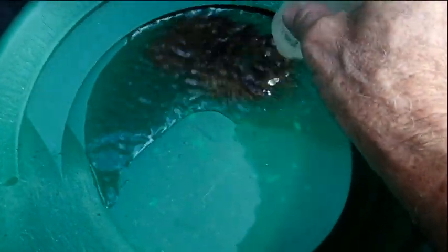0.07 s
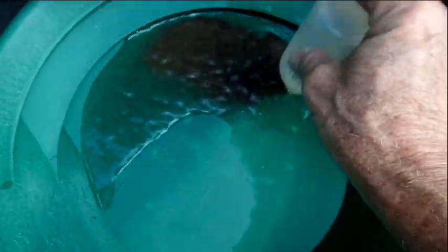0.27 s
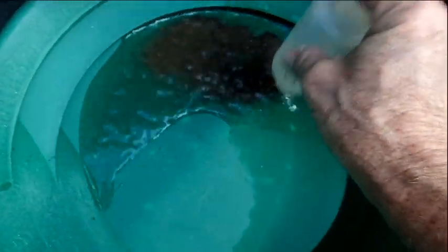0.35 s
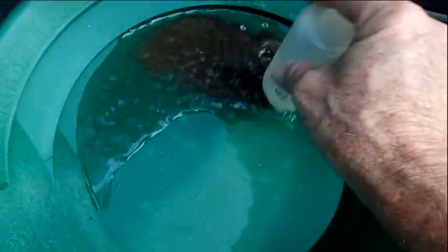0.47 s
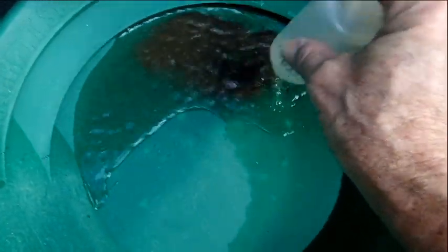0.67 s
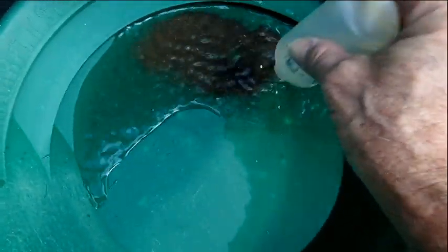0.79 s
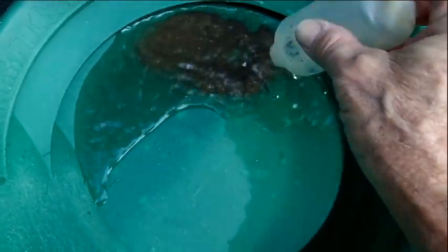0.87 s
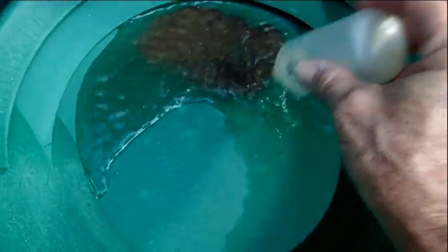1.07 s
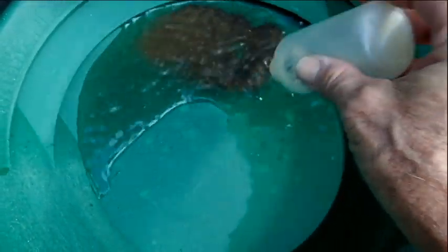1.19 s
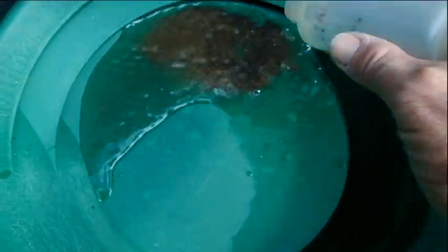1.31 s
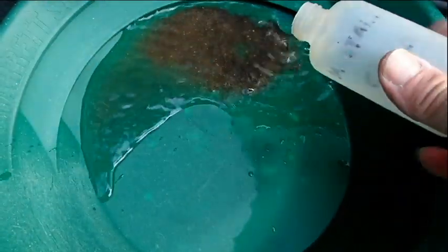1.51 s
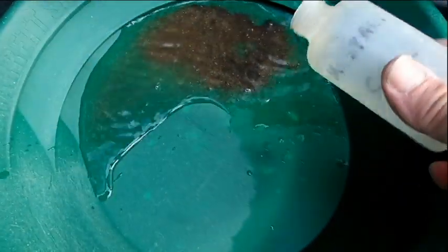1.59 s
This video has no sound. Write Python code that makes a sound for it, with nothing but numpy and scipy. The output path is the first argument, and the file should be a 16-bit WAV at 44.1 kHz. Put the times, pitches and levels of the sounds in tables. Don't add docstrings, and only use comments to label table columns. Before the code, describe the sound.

Close by, a wet plastic pan is knocked four times in quick succession, its water shaking, gulping and splattering; then only the running creek, a few tiny drips and soft wind buffeting on the left remain.

```python
import sys
import numpy as np
from scipy import signal
from scipy.fft import rfft, irfft, next_fast_len
from scipy.io import wavfile
from scipy.ndimage import uniform_filter1d, map_coordinates

SR = 44100
rng = np.random.default_rng(int(sys.argv[2]) if len(sys.argv) > 2 else 0)


def digitize_waveform(pressure):
    field = np.atleast_2d(pressure).T
    bounded = np.clip(field, -1, 1)
    quanta = np.round(bounded * 32767).astype(np.int16)
    wavfile.write(sys.argv[1], SR, quanta)


def boost(x):
    u = np.asarray(x, float) / 20
    return 10 ** u


N = 72765

RAP_TIMES = [.2451, .3723, .5282, .6486]
# [level/dB, hardness/dB per octave, rim share/dB, crack/dB]
RAP_BLOWS = [
    (-2, 1.5, 0.5, -18),
    (2.5, -6.5, 1, -7),
    (-1.5, 2.5, -7.5, -45),
    (2, 6, 5, 2),
]


def unit(x):
    return x / np.sqrt(np.mean(x ** 2) + 1e-20)


def along(points, hz):
    f, v = np.transpose(points)
    return np.interp(np.log(hz + 1), np.log(f + 1), v)


def curve(rows):
    return np.interp(np.arange(N) / SR, *np.transpose(rows))


def wobble(rate):
    knots = rng.standard_normal(400)
    return map_coordinates(knots, [np.arange(N) * rate / SR])


def filtered(x, response):
    m = next_fast_len(x.shape[-1] + SR // 4)
    hz = np.fft.rfftfreq(m, 1 / SR)
    return irfft(rfft(x, m) * response(hz), m)[..., :x.shape[-1]]


def rush(spectrum, patchy_db=0, size=N):
    z = signal.stft(rng.standard_normal(size), nperseg=512)[2]
    patches = uniform_filter1d(rng.standard_normal(z.shape), 5, 0)
    patches = uniform_filter1d(patches, 6, 1)
    x = signal.istft(z * boost(patchy_db * unit(patches)), nperseg=512)[1][:size]
    return unit(filtered(x, lambda hz: boost(along(spectrum, hz))))


def add(track, s, sound):
    part = track[round(s * SR):][:len(sound)]
    part += sound[:len(part)]


def creek():
    # [t/s, level/dB]
    strength = [(0.0, -1), (1.65, 0)]
    # [f/Hz, level/dB per Hz]
    babble = [(20, -34), (90, -4), (200, -4.5), (420, -4.5), (650, -12.5), (1000, -2.5), (1900, -14.5),
              (2700, -33.5)]
    spray = [(2500, -18), (3200, -21), (5000, -3.5), (6300, -0.5), (7500, -5), (9000, -0.5), (10500, -19),
             (13000, -15.5)]
    babble_covered = [(200, 11), (650, -1.5), (1300, 4.5), (2000, -8), (2400, -15), (3300, -29),
                      (4300, -15)]
    spray_covered = [(4300, -37), (4900, -21), (5400, -6), (6500, 0), (7500, -5), (9000, 0.5),
                     (10500, -11.5), (15000, -14.5)]
    flow = boost(curve(strength) + .4 * wobble(6))
    left = boost(-55.5 + 2.0 * wobble(24.8)) * rush(babble_covered, 0.5)
    left = left + boost(-52) * rush(spray_covered, 0.98)
    right = boost(-41) * rush(babble, 2.8) + boost(-46.5) * rush(spray, 1.0)
    return flow * np.array([left, right])


def wind():
    # [f/Hz, level/dB per Hz]
    buffet = [(15, -10), (52, -3), (100, -5), (200, -13.5), (300, -26.5), (650, -36), (1500, -71)]
    # [t/s, level/dB]
    gust = [(0, 0.5), (.15, -2.5), (.3, -3.5), (.45, -1.5), (.65, -3.5), (.85, -2), (1.05, 0.5), (1.2, 0.5),
            (1.35, 0), (1.5, -2.5), (1.65, -1)]
    # [t/s, level/dB, width/s]
    puffs = [(0.2127, -29, 0.00036), (0.215, -25, 0.0017), (0.3457, -21, 0.0036), (0.894, -27.5, 0.0032),
             (1.002, -32, 0.0014), (1.121, -28, 0.0045), (1.389, -24, 0.0026), (1.414, -28.5, 0.0008),
             (1.5928, -26.5, 0.00035), (1.604, -21.5, .0015), (1.6457, -21, 0.0014)]
    t = np.arange(N) / SR
    lumpy = boost(0.91 * wobble(30.13)) * rush(buffet, .8)
    out = unit(lumpy) * boost(-37.5 + curve(gust))
    for s, db, width in puffs:
        u = (t - s) / width
        out += boost(db) * (1 - u ** 2) * np.exp(-.5 * u ** 2)
    return out


def drops():
    # [t/s, level/dB, f/Hz, width/octaves]
    spits = [(0.041, -31.5, 12400, .5), (.047, -31.5, 5700, .6), (0.063, -33, 13500, .3),
             (.086, -35, 6140, 0.66), (.261, -26, 7900, 0.34), (.271, -27, 4550, 0.07),
             (.344, -32, 5300, 0.72), (0.404, -28, 6600, 0.25), (.418, -39, 4160, .15),
             (.440, -42, 12500, .3), (0.456, -38.5, 2980, .2), (0.479, -29.5, 4600, 0.3),
             (.551, -29, 8900, 0.46), (0.568, -20.5, 4750, 0.27), (.597, -27.5, 7250, 0.47),
             (0.6, -32, 13700, 0.25), (0.603, -32.5, 5330, 0.26), (.740, -34, 8200, 0.23),
             (0.825, -34, 8600, 0.12), (1.056, -40, 13500, .2), (1.119, -35, 13500, .2),
             (1.459, -36.5, 8900, 0.18), (1.519, -28.5, 7150, 0.4), (1.593, -25, 5240, 0.2)]
    t60 = .009
    out, t = np.zeros(N), np.arange(SR // 40) / SR
    for s, db, hz, octaves in spits:
        noise = rng.standard_normal(len(t))
        band = filtered(noise, lambda f: np.exp(-(np.log2((f + 1) / hz) / octaves) ** 2))
        fade = boost(db - 60 * t / t60) * (1 - np.exp(-t / 0.00033))
        add(out, s, fade * unit(band))
    return out


def glugs():
    glug_times = [.551, .585, .829, .708, .289, .400]
    # [first f/Hz, last f/Hz, level/dB, t60/s]
    pockets = [
        (157.41, 308, -5.5, 0.074),
        (320, 362, -16.5, .16),
        (290, 365, -30.5, 0.11),
        (183.6, 134, -23.5, 0.077),
        (193, 175, -26, 0.17),
        (227, 169, -18, 0.046),
    ]
    glide_s, rise_share = .007, .045
    out, t = np.zeros(N), np.arange(SR // 4) / SR
    for s, (first_hz, last_hz, db, t60) in zip(glug_times, pockets):
        cycles = last_hz * t - (last_hz - first_hz) * glide_s * (1 - np.exp(-t / glide_s))
        fade = boost(db - 60 * t / t60) * (1 - np.exp(-t / (rise_share * t60)))
        add(out, s, fade * np.sin(2 * np.pi * cycles))
    return out


def raps():
    # [f/Hz, level/dB, t60/s]
    pan = [(183.6, -37, 0.2), (259, -4, 0.036), (358, 1, 0.051), (436, 0, 0.042), (545.5, -8.5, 0.047),
           (659, -9, 0.032), (769, -1.5, 0.012), (950, -4.5, 0.027), (1022.5, -2, 0.032),
           (1166, -4.5, 0.012), (1570, -23.5, 0.03), (1903, -11, .015), (2710, -32, 0.0058),
           (4710, -26.5, 0.015)]
    signs = [1, 1, 1, -1, 1, 1, 1, 1, -1, 1, -1, 1, -1, 1]
    # [f/Hz, level/dB]
    crack_colour = [(600, -22), (2000, 11.5), (3300, -5), (4600, 5), (6000, -3), (10000, -16),
                    (16000, -20.5)]
    slosh_colour = [(120, 2), (250, 1), (400, 9), (600, 1), (1100, -7), (1900, -15.5), (3000, -41.5)]
    surge_colour = [(20, 3), (70, -4), (160, 7.5), (300, 10), (500, -37)]
    attack_s, rim_hz, rim_octaves = .0001, 1000, .4
    scatter_db, detune = 1.2, .008
    out, t = np.zeros(N), np.arange(SR // 3) / SR
    hz, db, t60 = np.transpose(pan)[:, :, None]
    octave = np.log2(hz / rim_hz)

    def rise(s):
        return 1 - np.exp(-t / s)

    swell = rise(attack_s + .004 * np.minimum(450 / hz, 1.2) ** 5) ** 2
    impulse = 1. * (np.arange(len(t)) == 0)
    click = filtered(impulse, lambda f: -boost(along(crack_colour, f)) * np.exp(-2j * np.pi * f * attack_s))
    click = click / np.abs(click).max()
    for s, (level_db, hard_db, rim_db, crack_db) in zip(RAP_TIMES, RAP_BLOWS):
        chance = rng.standard_normal((2, len(pan), 1))
        gain_db = db + scatter_db * chance[0]
        gain_db = gain_db + hard_db * np.clip(octave, 0, 1)
        gain_db = gain_db + rim_db * np.exp(-(octave / rim_octaves) ** 2)
        tones = np.sin(2 * np.pi * hz * (1 + detune * chance[1]) * t)
        ring = np.dot(signs, swell * boost(gain_db - 60 * t / t60) * tones)
        crack_fade = boost(-3.5 - 60 * t / 0.0069) + boost(-23.5 - 60 * t / 0.047)
        crack = crack_fade * rush(crack_colour, size=len(t))
        slosh = boost(-18.5 - 60 * t / 0.11) * rise(0.0027)
        slosh = slosh * rush(slosh_colour, patchy_db=-3.5, size=len(t))
        surge = boost(-26.5 - 60 * t / .4) * rise(.015)
        surge = surge * rush(surge_colour, patchy_db=4, size=len(t))
        add(out, s, boost(level_db) * (ring + boost(crack_db) * (crack + click) + slosh + surge))
    return out


def scene():
    # [f/Hz, level/dB]
    cover = [(60, -6), (160, -10), (270, -15), (450, -18), (1000, -22), (2000, -28), (5500, -24),
             (15000, -25)]
    lag_s = .00011
    pan = raps() + glugs() + drops()
    left = filtered(pan, lambda hz: boost(along(cover, hz)) * np.exp(-2j * np.pi * hz * lag_s))
    return np.array([left + wind(), pan]) + creek()


def top_cut(x):
    return signal.sosfilt(signal.butter(12, 16090, fs=SR, output="sos"), x)


def record(dry):
    t = np.arange(N) / SR
    duck_db = np.zeros(N)
    for s, (*_, crack_db) in zip(RAP_TIMES, RAP_BLOWS):
        depth_db = -5 * min(boost(crack_db + 4.5), 1)
        duck_db += depth_db * np.exp(-np.maximum(t - s, 0) / .08) * (t > s)
    x = filtered(dry * boost(duck_db), lambda hz: hz < 15750)
    clip_top, clip_hard = 1.0, 30
    x = x / (1 + np.abs(x / clip_top) ** clip_hard) ** (1 / clip_hard)
    return top_cut(x)


dry = scene()
out = record(dry)
digitize_waveform(out)
```